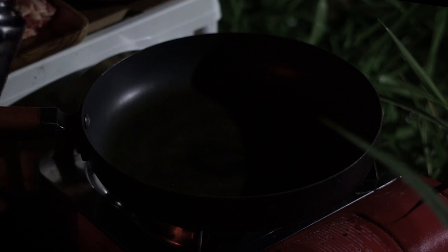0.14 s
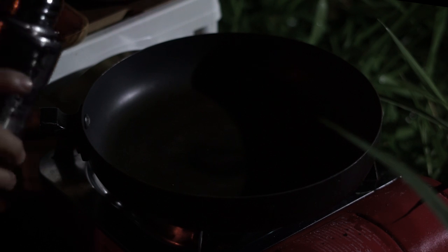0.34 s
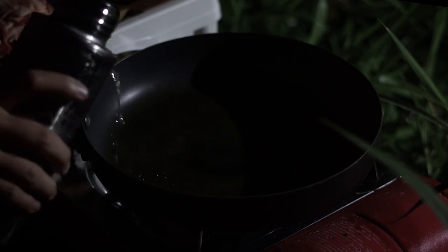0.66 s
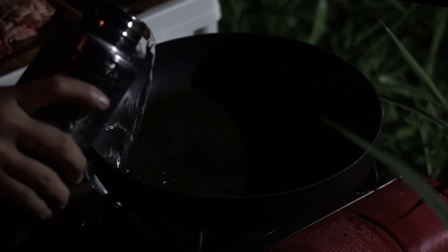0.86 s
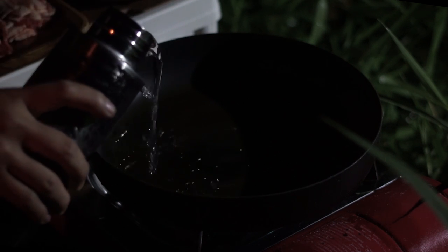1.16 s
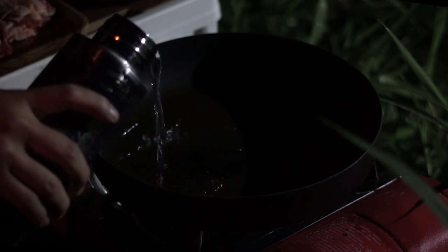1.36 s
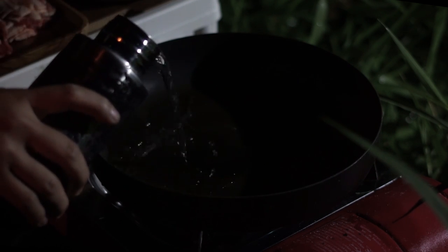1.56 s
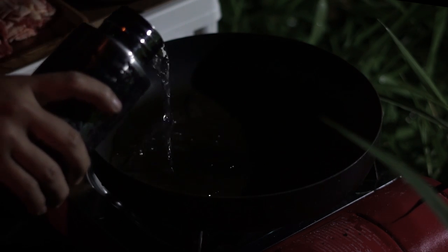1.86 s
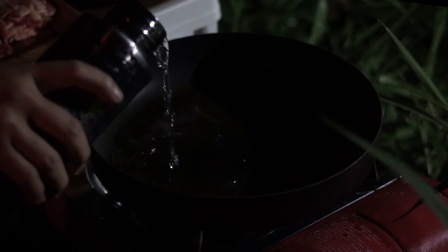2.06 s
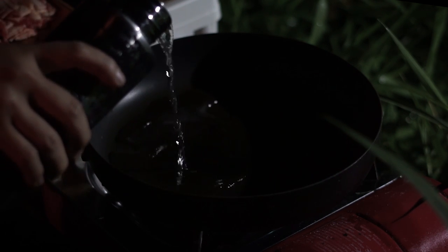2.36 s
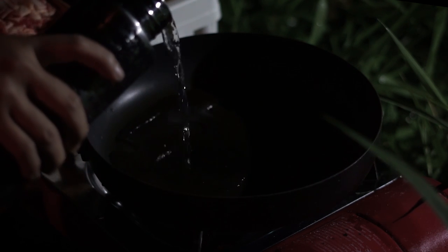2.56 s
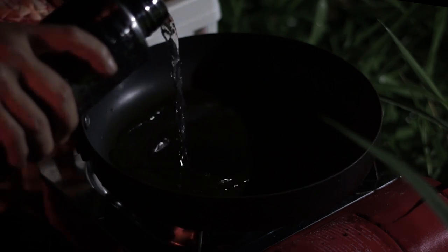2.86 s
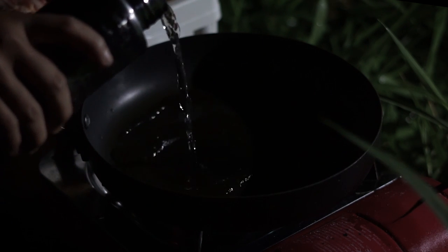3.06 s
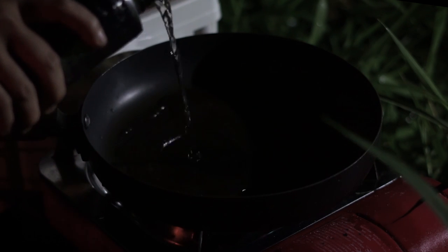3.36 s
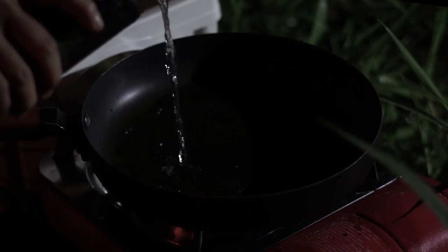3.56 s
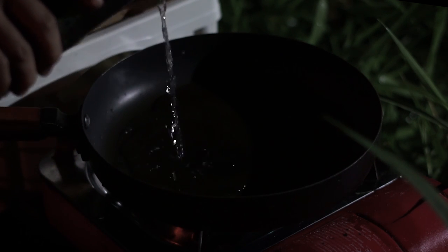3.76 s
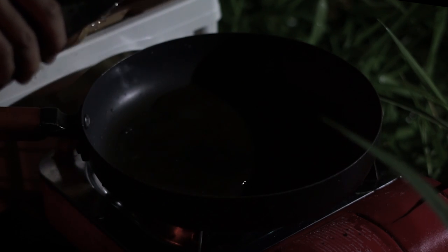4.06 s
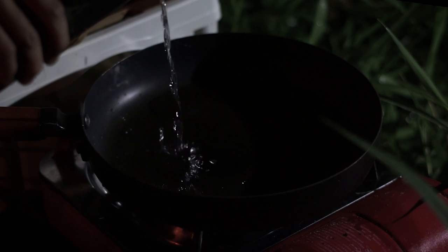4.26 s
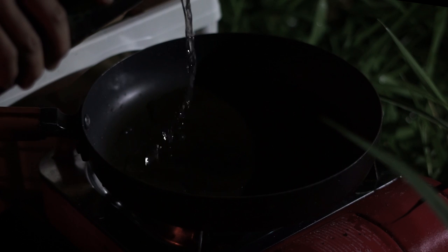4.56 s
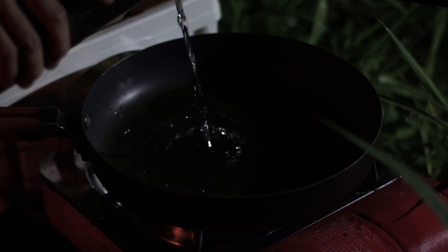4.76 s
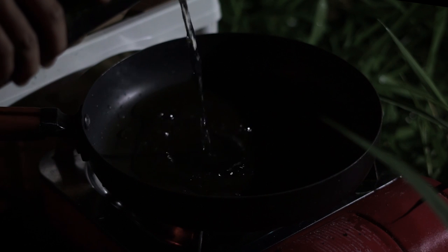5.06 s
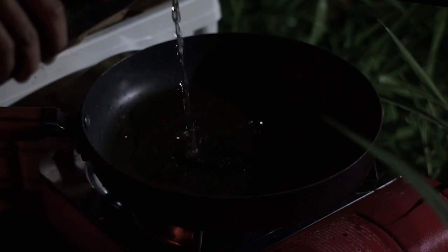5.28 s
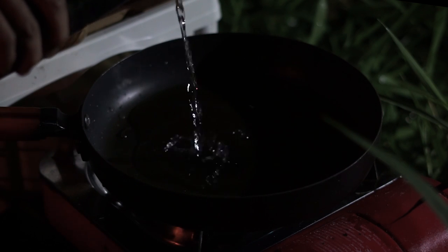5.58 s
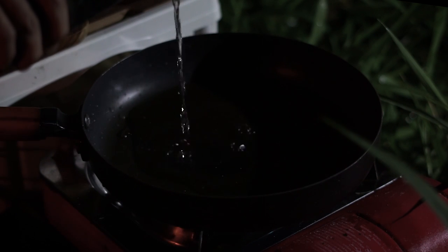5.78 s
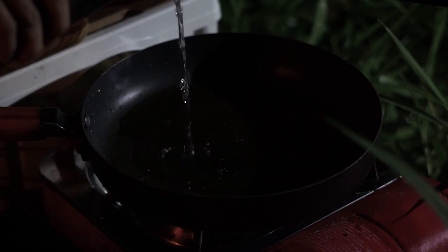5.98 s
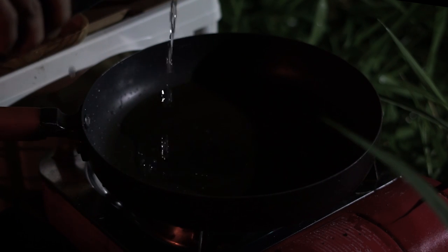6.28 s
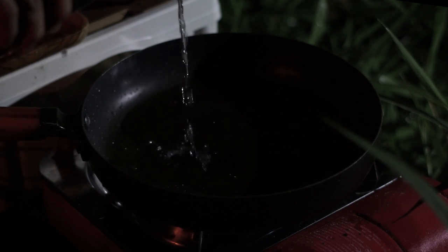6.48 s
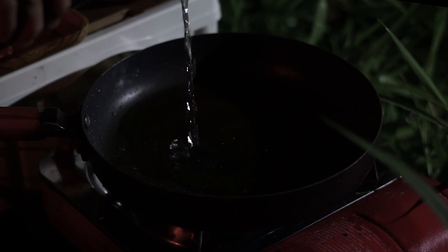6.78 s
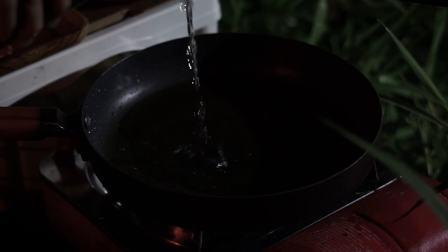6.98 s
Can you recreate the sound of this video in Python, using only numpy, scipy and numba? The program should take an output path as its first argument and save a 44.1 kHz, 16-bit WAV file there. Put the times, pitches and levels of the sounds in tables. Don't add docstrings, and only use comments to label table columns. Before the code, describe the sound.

Insects alone at first, shrill and steady, in open air with no room echo. Then sparse crisp ticks and thin metallic tinks as water touches hot metal, a quiet simmer, a burst of cracks near 4.4 seconds, and dense sizzling pops from 5.6 seconds to the end. Close, thin, bright sound without bass; the background dips briefly after the loudest pops.

```python
import sys
import numpy as np
from scipy import signal
from scipy.fft import rfft, irfft, next_fast_len
from scipy.io import wavfile
from scipy.ndimage import uniform_filter1d, minimum_filter1d
from numba import njit

SR = 44100
rng = np.random.default_rng(int(sys.argv[2]) if len(sys.argv) > 2 else 0)


def how_loud(loudness_db):
    steps = np.asarray(loudness_db, float) / 20
    return 10 ** steps


def master(y):
    cut = np.clip(np.atleast_2d(y).T, -1, 1)
    pcm = np.round(cut * 32767)
    wavfile.write(sys.argv[1], SR, pcm.astype(np.int16))


N = 314433
T = np.arange(N) / SR

# (frequency [Hz], level [dB], decay t60 [s])
PAN_LOW = [(2400, 0, .5), (2435, -12, .3), (1830, -18, .25), (3050, -14, .3)]
# (time [s], pitch factor [1])
LOAD = [(0, .975), (1.5, .968), (3.7, .962), (4.4, .956), (5.6, .934), (6.1, .927), (7.13, .917)]
REST_START_S, REST_END_S, REST_DB = 5.71, 6.13, -13


def curve(table):
    return np.interp(T, *np.transpose(table))


def unit(x):
    return x / np.sqrt(np.mean(x ** 2))


def walk(rate):
    k = int(SR / rate)
    held = np.repeat(rng.standard_normal(N // k + 1), k)
    return 1.6 * uniform_filter1d(uniform_filter1d(held, k), k)[:N]


def band(x, hz, width_hz):
    b, a = signal.iirpeak(hz, hz / width_hz, fs=SR)
    return signal.lfilter(b, a, signal.lfilter(b, a, x))


def sides(pan_db):
    return how_loud(np.array([[pan_db], [-pan_db]]) / 2)


def add(out, s, sound):
    i = int(s * SR)
    out[:, i:i + sound.shape[1]] += sound[:, :N - i]


def ring(hz, t60, turn, rise=0.):
    t = np.arange(int(t60 * SR) + 2) / SR
    phase = 2 * np.pi * hz * (t + rise * t ** 2 / 2)
    return np.sin(phase + np.reshape(turn, (2, 1))) * how_loud(-60 * t / t60)


def fade_in(tone, rise_s):
    return tone * np.minimum(T[:tone.shape[1]] / rise_s, 1)


def air():
    # (frequency [Hz], density [dB per Hz], left-right likeness [-1..1], left minus right [dB])
    air_bands = [(905, -99, 0.27, -7), (1460, -99, -0.027, -3), (1940, -99, -0.41, -0.5),
                 (2910, -93, -0.56, -3), (3050, -88.5, 0.21, -5.5), (4300, -95.5, -0.26, -5.5),
                 (5900, -97.5, 0.06, -4.5), (7040, -98, -0.35, -10.5), (7500, -95.5, -0.15, -6.5),
                 (10000, -99, -0.31, -2.5), (13000, -98.5, -0.22, -3.5), (16200, -100.5, 0.19, -2.5)]
    size = next_fast_len(N)
    where = np.log(np.arange(size // 2 + 1) * SR / size + 1)
    hz, *columns = np.transpose(air_bands)
    db, alike, pan_db = (np.interp(where, np.log(hz), c) for c in columns)
    alike = np.clip(alike, -1, 1)
    mid, side = rfft(rng.standard_normal((2, size)))
    mid = mid * np.sqrt((1 + alike) / 2)
    side = side * np.sqrt((1 - alike) / 2)
    pair = np.array([(mid + side) * how_loud(db + pan_db / 2), (mid - side) * how_loud(db - pan_db / 2)])
    breath = how_loud(0.21 * walk(3.3) + .5 * walk(18))
    return irfft(pair, size)[:, :N] * np.sqrt(SR) * breath


def resting(ramp_s):
    return np.clip(1 + np.minimum(T - REST_START_S, REST_END_S - T) / ramp_s, 0, 1)


def chorus():
    # (frequency [Hz], width [Hz], rms level [dB])
    far_groups = [(3193, 89, -56.5), (4512, 130, -67.5), (4883, 200, -58.5), (5100, 170, -57.5),
                  (5192, 320, -54.5), (5355, 89, -56), (5455, 160, -55.5), (5550, 160, -57.5),
                  (7283, 430, -62.5), (10540, 170, -72)]
    out = 0
    for hz, width_hz, db in far_groups:
        voices = unit(band(rng.standard_normal((2, N)), hz, width_hz))
        throb = how_loud(db + 1.4 * walk(3.6) + 1.2 * walk(40))
        hush = how_loud((hz < 4000) * REST_DB / 2 * resting(.04))
        out = out + voices * throb * hush * sides(-7.5 * (hz > 4000))
    return out


def cricket(hz, beat, shape, width_hz, clean, lead):
    wobble = 1 + 0.0014 * walk(14)
    tone = np.sin(2 * np.pi * np.cumsum(hz * wobble) / SR + np.array([[lead], [0]]))
    blur = unit(band(rng.standard_normal((2, N)), np.mean(hz), width_hz))
    voice = clean * np.sqrt(2) * tone + (1 - clean) * blur
    return voice * shape(beat % 1) * how_loud(1.2 * walk(5))


def crickets():
    # (time [s], lead [beats])
    low_beat = [(0, -.45), (.6, -.5), (1.4, -.5), (1.8, -.41), (2.6, -.36), (3.8, -.4), (5, -.35),
                (5.6, -.4), (6.1, -.05), (7.13, 0.)]
    # (time [s], lead [beats])
    high_beat = [(0, .26), (1.4, .11), (3.3, -.35), (4.1, -.22), (5, -.35), (7.13, -.49)]
    off = lambda p: np.minimum(p, 1 - p)
    stroke = lambda p: np.clip(1.7 - off(p) / .13, .08, 1)
    chirp = lambda p: np.clip((.31 - off(p)) / .05, 0, 1) * np.clip(off(p) / .08, .5, 1)
    trill = lambda p: .65 + .35 * np.cos(2 * np.pi * p)
    low_hz = 3182 - 28 * resting(.9)
    low = cricket(low_hz, 13.8 * T + curve(low_beat), stroke, width_hz=60, clean=.8, lead=1.2)
    near = cricket(3427, 42.2 * T, trill, width_hz=40, clean=.4, lead=2.1)
    high = cricket(7252, 5.5 * T + curve(high_beat), chirp, width_hz=110, clean=.4, lead=2.9)
    low = low * how_loud(-47.5 + REST_DB * resting(0.034)) * sides(-.6)
    return low + near * how_loud(-59.5) * sides(-12.5) + high * how_loud(-55.0) * sides(-10.0)


def hum():
    # (time [s], top level [dB])
    hum_swells = [
        (3.9, -68),
        (5.5, -63),
        (7.1, -74),
    ]
    rest_db, fade_db_per_s = -92, 70
    phase = 2 * np.pi * np.cumsum(PAN_LOW[0][0] * curve(LOAD)) / SR + np.array([[.7], [0]])
    swells = [np.maximum(db - fade_db_per_s * abs(T - s), rest_db) for s, db in hum_swells]
    knocks = (walk(120) * np.cos(phase) + walk(120) * np.sin(phase)) * how_loud(2.5 * walk(14))
    return knocks * how_loud(np.max(swells, axis=0)) * sides(-8.5)


def boil():
    # (time [s], top level [dB], fade [dB per s])
    surges = [(1.01, -50.5, 33.5), (1.72, -54, 79.5), (3.82, -55.5, 28), (4.36, -51, 64), (4.8, -49, 68),
              (5.62, -45, 30.5), (5.74, -50, 105), (6.1, -48.5, 45), (6.57, -47.5, 52.5), (6.9, -56.5, 20),
              (7.13, -45.5, 50)]
    rise_db_per_s, calm_db, warming_db_per_s = 89, -68, 1.97
    tops = [db - np.where(T < s, rise_db_per_s * (s - T), fade * (T - s)) for s, db, fade in surges]
    return np.maximum(calm_db + warming_db_per_s * T, np.max(tops, axis=0))


def sizzle(per_s=500, spread_db=4.5):
    out = 0
    for hz in (8000, 9800, 11500, 13200, 14800):
        hits = rng.random(N) < per_s / SR
        strength = how_loud(spread_db * np.minimum(rng.exponential(size=N), 4))
        ticks = hits * strength * rng.choice([-1, 1], N)
        spray = 0.035 * rng.standard_normal((2, N))
        tilt_db = (hz - 11500) * 0.00043
        out = out + unit(band(ticks + spray, hz, 0.43 * hz)) * how_loud(tilt_db + 4.1 * walk(30))
    return unit(out) * sides(-5.0) * how_loud(boil() - 2.0)


def bubbles():
    # (time [s], frequency [Hz], rise [1/s], level [dB], decay t60 [s])
    bloops = [
        (4.851, 1450, 32, -41, .06),
        (4.858, 2870, .2, -42, .14),
        (1.443, 3500, 8, -48, .03),
        (6.612, 1800, 25, -53, .04),
    ]
    out = np.zeros((2, N))
    for s, hz, rise, db, t60 in bloops:
        tone = fade_in(ring(hz, t60, [0, .5], rise), (rise + 4) / 4000)
        add(out, s, how_loud(db) * sides(-6.0) * tone)
    return out


def tinks():
    # (time [s], frequency [Hz], level [dB], decay t60 [s])
    thin_rings = [(.872, 11790, -43, .1), (.99, 11800, -50, .05), (1.003, 14000, -52, .14),
                  (1.075, 13000, -55, .1), (1.0, 4400, -48, .03), (1.03, 4450, -50, .03),
                  (5.708, 4930, -44, .2), (6.776, 6030, -40, .05)]
    out = np.zeros((2, N))
    for s, hz, db, t60 in thin_rings:
        add(out, s, how_loud(db) * sides(-13.5) * ring(hz, t60, [0, .8]))
    return out


def pop(hz, width_hz, chance, spray_db=-19, spray_t60=.025, damp=2.9):
    t = T[:3000] - .002
    lead = np.array([[1.5 * chance[1]], [0]])
    shape = lambda u: np.where(u < 0, np.exp(-.5 * (8.2 * u) ** 2), np.exp(-damp * np.abs(u)))
    wave = lambda u: np.cos(2 * np.pi * (hz * u + chance[0]) + lead)
    snap = lambda s: shape((t - s) * width_hz) * wave(t - s)
    echoes = .25 * snap(.0007 + .0006 * chance[2]) + .2 * snap(.0016 + .0012 * chance[3])
    spray = unit(band(rng.standard_normal((2, len(t))), min(hz, 15000), 4.2 * width_hz))
    return snap(0) + echoes + (t > 0) * how_loud(spray_db - 60 * t / spray_t60) * spray


def spits():
    # (time [s], crack level [dB], crack pitch [Hz], low tone level [dB], high tone level [dB])
    cracks = [(1.445, -65.5, 3700, -75, -54.5), (3.66, -49, 2330, -67.5, -69),
              (3.814, -33, 5550, -51, -61.5), (3.96, -58, 4960, -59, -68.5),
              (4.361, -33.5, 3800, -69.5, -66), (4.378, -19.5, 3350, -42.5, -49.5),
              (4.811, -46.5, 2900, -74.5, -73), (4.858, -31.5, 3080, -70.5, -74),
              (5.347, -25.5, 5730, -63, -63), (5.6136, -16.5, 3260, -48.5, -33),
              (5.684, -41.5, 4250, -63.5, -70.5), (5.937, -54, 5200, -56, -69),
              (5.9535, -23, 5070, -46.5, -43.5), (6.0038, -33, 4270, -45, -43),
              (6.0876, -21.5, 4300, -45.5, -36.5), (6.301, -51, 3140, -58, -72.5),
              (6.6134, -48, 2260, -62.5, -61), (6.7755, -40, 6270, -52.5, -64),
              (6.80, -56, 3580, -57.5, -60.5), (6.891, -46, 3100, -51, -52), (6.989, -55, 3620, -54.5, -68),
              (7.099, -52, 3580, -52, -52), (7.1234, -20.5, 4770, -54, -34)]
    # (frequency [Hz], level [dB], decay t60 [s])
    pan_high = [(3960, 0, .54), (3745, -13, .3), (5280, -14, .25)]
    out = np.zeros((2, N))
    for s, db, hz, low_db, high_db in cracks:
        chance = rng.random(4)
        width_hz = .085 * hz * (hz / 3400) ** 1.5
        crack = pop(hz, width_hz, 0.22 * chance, spray_db=-12.5, spray_t60=0.12, damp=1.6)
        add(out, s - .001, how_loud(db - 3.5) * sides(-8.0) * crack)
        tick = pop(1.5 * hz, 820, chance, spray_db=-13, spray_t60=0.047)
        add(out, s - .0012, how_loud(db - 9) * sides(-7.5) * tick)
        load = np.interp(s, *np.transpose(LOAD))
        for modes, tone_db in ((PAN_LOW, low_db), (pan_high, high_db)):
            for (mode_hz, mode_db, t60), turn in zip(modes, chance):
                tone = ring(mode_hz * load, t60 * load ** 14, 6.3 * turn + np.array([.7, 0]))
                gain = how_loud(tone_db + mode_db + 2.0) * sides(-8.0)
                add(out, s + 0.0011, gain * fade_in(tone, 0.0031))
    return out


def small_pops(start_s):
    usual_per_s, usual_boil_db, middle_db, spread_db = 30, -50, -45, 9
    when, keep, size, pitch = rng.random((2000, 4)).T
    s = when * N / SR
    per_s = usual_per_s * how_loud(1.3 * (boil()[(when * N).astype(int)] - usual_boil_db))
    rows = np.transpose([s, middle_db + spread_db * (size - .5), 15000 - 5000 * pitch ** 2])
    return rows[(keep * len(s) * SR / N < per_s) & (s > start_s)]


def pops():
    # (time [s], peak level [dB], pitch [Hz])
    first_pops = [(.8134, -44, 12500), (.8719, -30, 12350), (.876, -29.5, 11500), (.987, -34, 11500),
                  (1.0018, -38, 14300), (1.0223, -42, 13700), (1.074, -39, 13200), (1.4677, -45, 13400),
                  (1.7319, -40, 14800), (1.7455, -43, 14500), (2.6557, -45, 13900), (2.851, -28.5, 9100),
                  (3.2025, -45, 13400), (3.5485, -44, 14800), (3.6557, -35.5, 13900), (3.8154, -25, 13000),
                  (3.8239, -29.5, 13640), (3.8685, -34.5, 9800), (3.8775, -30, 14000),
                  (3.9428, -36.5, 13940), (4.312, -42, 10700), (4.3286, -33, 10400), (4.3784, -33, 12300),
                  (4.3921, -36, 10800), (4.4005, -26.5, 12450), (4.543, -39, 8350), (4.6783, -40, 12600),
                  (4.7106, -34, 10600), (4.7377, -30.5, 8700), (4.7793, -28.5, 14630)]
    # (time [s], peak level [dB], pitch [Hz])
    seething_pops = [(4.7923, -22.5, 11260), (4.804, -35, 13650), (4.8121, -38, 11500), (4.841, -32, 9000),
                     (4.8825, -36.5, 9100), (5.1085, -34, 13200), (5.2106, -29, 10200),
                     (5.2217, -31.5, 9500), (5.2432, -32.5, 13000), (5.3491, -22.5, 14150),
                     (5.423, -37, 15100), (5.5666, -29, 14100), (5.572, -31.5, 13500), (5.613, -22, 12600),
                     (5.6327, -37, 13300), (5.6373, -27, 10100), (5.6464, -34.5, 13000),
                     (5.66, -27.5, 14000), (5.6716, -22.5, 10000), (5.691, -27, 11500),
                     (5.7082, -16.5, 10000), (5.7168, -24.5, 12740), (5.7211, -29.5, 13900),
                     (5.7279, -26, 14760), (5.748, -34, 14100), (5.7762, -33, 14900), (5.796, -34, 13700),
                     (5.8994, -31, 12400), (5.9371, -24, 10350), (5.9548, -20, 11950)]
    # (time [s], peak level [dB], pitch [Hz])
    boiling_pops = [(6.0039, -16, 14800), (6.0885, -22, 13800), (6.128, -32.5, 9600),
                    (6.1496, -32.5, 14800), (6.375, -41, 12600), (6.505, -26.5, 13650),
                    (6.5365, -27, 14300), (6.5689, -29, 13700), (6.577, -27.5, 14200),
                    (6.614, -19.5, 14250), (6.6362, -21.5, 12700), (6.6482, -24.5, 14900),
                    (6.6827, -14, 14800), (6.686, -33, 13670), (6.7768, -26, 15300), (6.815, -38, 11600),
                    (6.8346, -37.5, 13600), (6.8925, -20.5, 13800), (6.9148, -34, 11100),
                    (6.934, -29, 11800), (6.947, -35, 11500), (6.9744, -34, 11500), (6.987, -31, 11200),
                    (7.0175, -30, 15000), (7.039, -30.5, 12900), (7.0842, -27, 14530), (7.1068, -25, 14800),
                    (7.1106, -41, 14000), (7.117, -34, 10200), (7.1247, -22, 12800)]
    faint_pops = small_pops(start_s=first_pops[0][0])
    out = np.zeros((2, N))
    for s, db, hz in [*first_pops, *seething_pops, *boiling_pops, *faint_pops]:
        chance = rng.random(5)
        width_hz = 1800 - .12 * (hz - 12000) + 30 * (db + 32.5)
        pan_db = -5.2 - 3.6 * chance[4]
        add(out, s - .002, how_loud(db + 7.0) * sides(pan_db) * pop(hz, width_hz, chance))
    return signal.sosfilt(signal.butter(4, 6600, "high", fs=SR, output="sos"), out)


def scene():
    night = air() + chorus() + crickets()
    pan = hum() + sizzle() + bubbles() + tinks() + spits()
    return night + pan + pops()


@njit
def duck(level, top, attack, release):
    gain, e = np.empty(len(level)), 0.
    for i in range(len(level)):
        e += (level[i] - e) * (attack if level[i] > e else release)
        gain[i] = min(1., top / (e + 1e-9)) ** .5
    return gain


def top_cut(x):
    return signal.sosfilt(signal.butter(12, 17050, fs=SR, output="sos"), x)


def record(dry):
    level = np.abs(dry).max(axis=0)
    x = dry * duck(level, 0.052, .007, 0.00021)
    x = signal.sosfilt(signal.butter(8, 1800, "high", fs=SR, output="sos"), x)
    below = signal.sosfiltfilt(signal.ellip(10, .2, 50, 15820, fs=SR, output="sos"), x)
    held_peak = uniform_filter1d(-minimum_filter1d(-level, size=500), size=200)
    loud = np.clip(held_peak / .15 - 1.2, 0, .4)
    return top_cut(below + loud * (x - below))


dry = scene()
out = record(dry)
master(out)
```